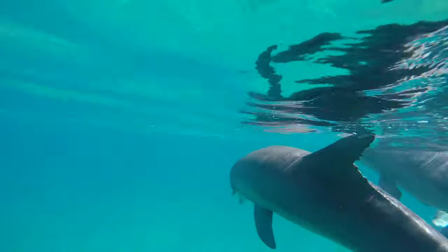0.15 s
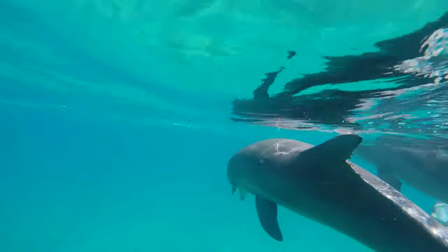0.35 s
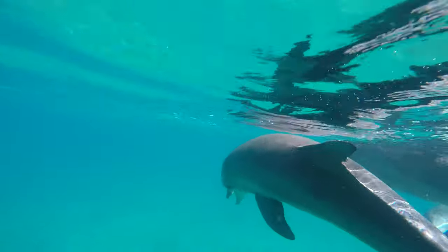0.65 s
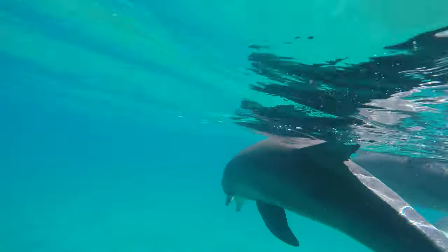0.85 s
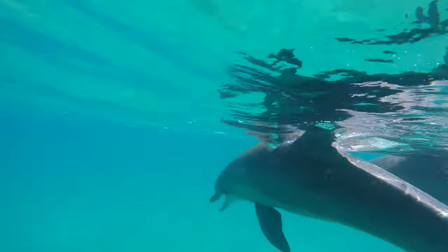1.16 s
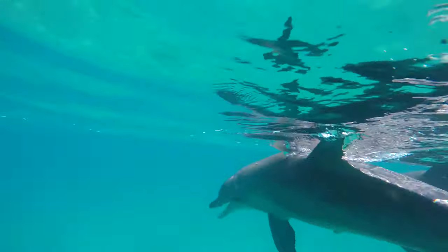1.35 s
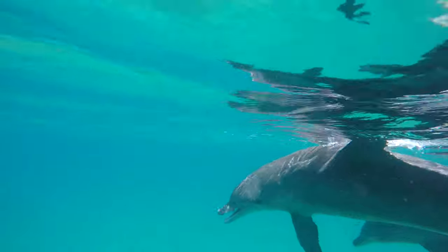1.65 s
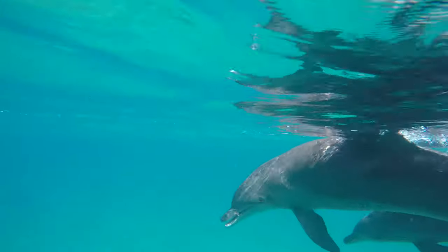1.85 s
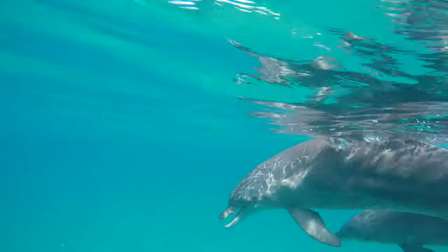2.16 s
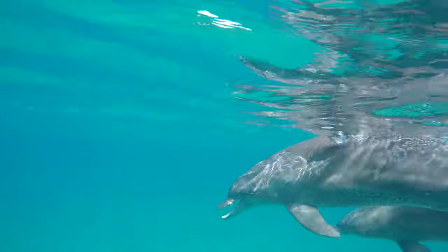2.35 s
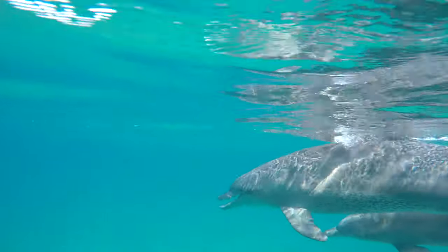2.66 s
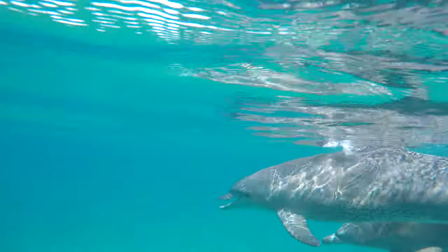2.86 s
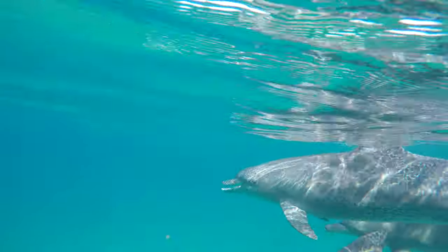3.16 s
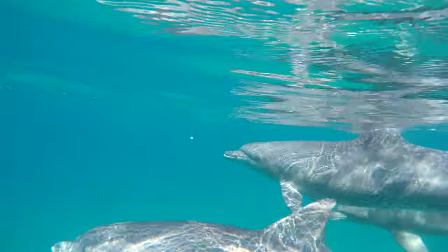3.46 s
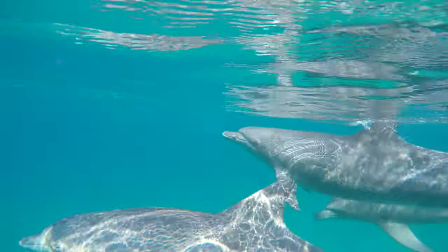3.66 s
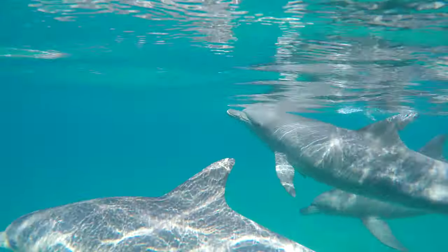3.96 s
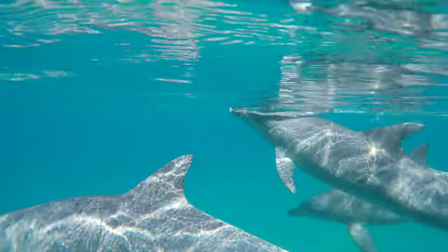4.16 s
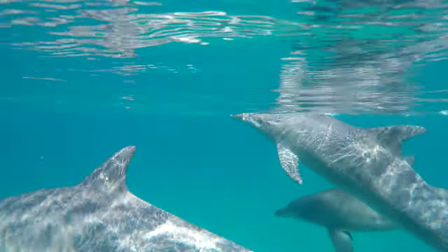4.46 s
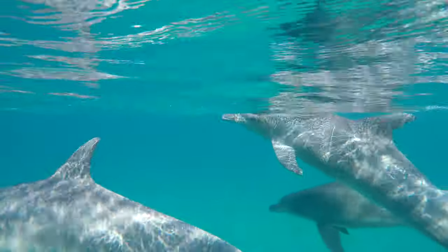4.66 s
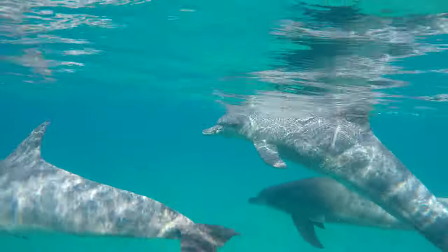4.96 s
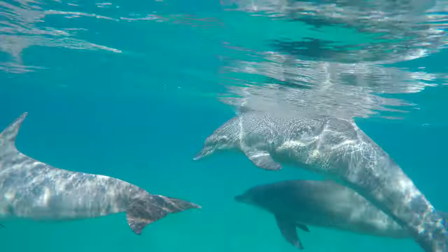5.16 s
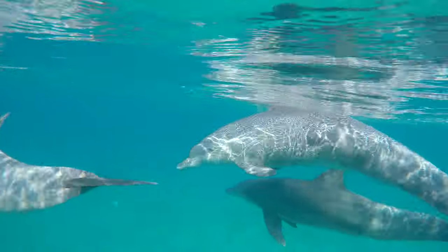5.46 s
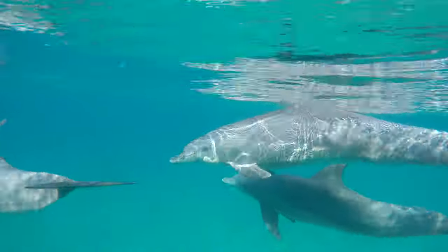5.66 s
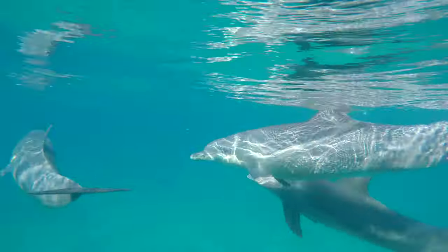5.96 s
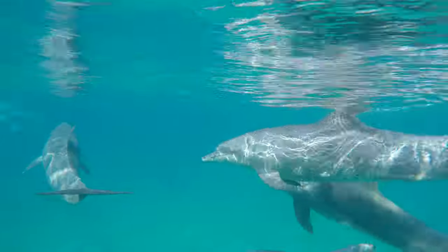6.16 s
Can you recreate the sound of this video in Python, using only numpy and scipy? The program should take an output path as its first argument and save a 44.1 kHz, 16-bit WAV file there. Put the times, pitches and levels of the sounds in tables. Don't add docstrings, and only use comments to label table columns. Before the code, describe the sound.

Underwater, dolphin sonar clicks buzz in rapid trains over low water rumble, with bubbly gulps, dull slaps, a knocking rattle and a tiny whistle.

```python
import sys
import numpy as np
from scipy import signal
from scipy.fft import rfft, irfft
from scipy.io import wavfile
from scipy.ndimage import uniform_filter1d

SR = 44100
rng = np.random.default_rng(int(sys.argv[2]) if len(sys.argv) > 2 else 0)


def file_out(sig):
    cols = np.atleast_2d(sig).T
    lim = np.clip(cols, -1, 1)
    pcm = np.round(lim * 32767).astype(np.int16)
    wavfile.write(sys.argv[1], SR, pcm)


def nominal_scale(level):
    x = np.asarray(level, float) / 20
    return 10 ** x


N = 278712


def rms_one(x):
    return x / np.sqrt(np.mean(x ** 2) + 1e-20)


def in_time(rows):
    s, *columns = np.transpose(rows)
    return [np.interp(np.arange(N) / SR, s, column) for column in columns]


def resonance(x, hz, width_hz):
    r = np.exp(-np.pi * width_hz / SR)
    zeros = np.array([1, 0, -1]) * (1 - r * r) / 2
    poles = [1, -2 * r * np.cos(2 * np.pi * hz / SR), r * r]
    return signal.lfilter(zeros, poles, x + 1e-18)


def body(x, modes):
    return sum((-1) ** k * nominal_scale(db) * resonance(x, hz, width) for k, (hz, width, db) in enumerate(modes))


def coloured(spectrum, lifts=()):
    hz = np.maximum(np.arange(N // 2 + 1) * SR / N, 1)
    corner_hz, corner_db = np.transpose(spectrum)
    db = np.interp(np.log(hz), np.log(corner_hz), corner_db)
    db += sum(lift / (1 + (2 * (hz - centre) / width) ** 2) for centre, width, lift in lifts)
    return rms_one(irfft(rfft(rng.standard_normal(N)) * nominal_scale(db), N))


def drift(rate_hz):
    r = np.exp(-2 * np.pi * rate_hz / SR)
    noise = rng.standard_normal(N + SR)
    return rms_one(signal.lfilter([1], [1, -2 * r, r * r], noise)[SR:])


def lumpy(rate_hz, lump_db):
    return rng.standard_normal(N) * nominal_scale(lump_db * drift(rate_hz))


def impulses(times, sizes):
    out = np.zeros(N)
    at = np.round(np.asarray(times) * SR).astype(int)
    np.add.at(out, np.clip(at, 0, N - 1), sizes)
    return out


def glide(rows):
    hz, db, *rest = in_time(rows)
    t = np.arange(N) / SR
    sounding = (t > rows[0][0]) * (t < rows[-1][0])
    return 2 * np.pi * np.cumsum(hz) / SR, np.sqrt(2) * nominal_scale(db) * sounding, rest


def flow_rumble():
    # (time [s], level [dB])
    flow_level = [(0.0, -32), (0.53, -28.5), (0.65, -25), (1.2, -30.5), (1.46, -27), (1.94, -34),
                  (1.97, -23.5), (2.04, -31.5), (2.2, -26), (2.32, -30.5), (3.71, -28), (4.03, -34),
                  (5.63, -31.5), (6.32, -30)]
    # (frequency [Hz], density [dB per Hz])
    rumble_spectrum = [(8.8, -30), (15, 2), (32, 2.5), (65, -4), (106, -13.5), (140, -34), (200, -36),
                       (260, -46.5), (440, -120)]
    return nominal_scale(in_time(flow_level)[0] + 1.46 * drift(2.6)) * coloured(rumble_spectrum)


def surge_db():
    # (start [s], rise [s], hold [s], release [s], cavity note level [dB])
    surges = [
        (0.09, 0.24, 0.37, .6, -54.5),
        (2.095, 0.029, 0.091, 0.2, -28),
        (2.2, 0.092, 0.543, 0.037, -47.5),
        (3.742, 0.088, 0.19, 0.39, -44.5),
        (5.729, 0.12, .6, .1, -44.5),
    ]
    t = np.arange(N) / SR
    calm_db, swing_db = -62, 20.5
    power = 0
    for start, rise, hold, release, db in surges:
        corners_s = np.cumsum([start, 0, rise, hold, release, .3])
        shape_db = np.interp(t, corners_s, [-60, -swing_db, 0, 0, -swing_db, -60])
        power = power + nominal_scale(db - calm_db + shape_db) ** 2
    return 10 * np.log10(1 + power)


def sea_hiss():
    # (frequency [Hz], density [dB per Hz])
    hiss_spectrum = [(530, 9), (900, 2.5), (1460, -5.5), (1640, -13), (2890, -1), (3820, -2), (7680, -9.5),
                     (13200, -12.5), (15300, -13), (16000, -35)]
    # (frequency [Hz], width [Hz], lift [dB])
    hiss_lifts = [(1627, 46, 14.5), (2340, 240, 9.5), (3240, 260, 4), (3830, 87, 6.5), (6660, 300, 2),
                  (9500, 130, 6)]
    level_db = -62.5 + 0.079 * surge_db() + 0.86 * drift(2.8)
    return nominal_scale(level_db) * coloured(hiss_spectrum, hiss_lifts)


def wash():
    # (frequency [Hz], width [Hz], level [dB])
    cavity_modes = [(625, 84, -27.5), (720, 110, -44)]
    # (time [s], frequency [Hz])
    cavity_pitch = [(0.0, 627), (2.1, 597), (2.2, 625), (2.27, 665), (2.4, 610.5), (2.85, 609), (3.8, 630),
                    (4.2, 625), (5.8, 625), (6.0, 625), (6.3, 611)]
    # (frequency [Hz], width [Hz], level [dB])
    second_mode = (991, 30, -23.5)
    # (frequency [Hz], width [Hz], level [dB])
    gurgle_modes = [(156, 48, 9.5), (337, 93, 5), (484, 450, -36)]
    # (frequency [Hz], width [Hz], level [dB])
    fizz_modes = [(1505, 260, -1), (1718, 120, 4), (1945, 140, -1.5)]
    lift_db = surge_db()
    note_db = -62 + lift_db
    gurgle_db = -70 + 0.95 * lift_db
    fizz_db = -70.5 + 0.32 * lift_db

    breath = body(lumpy(25.0, 2.9), cavity_modes)
    breathy = rms_one(resonance(resonance(breath, 453, 206), 632, 360))
    waver_hz = in_time(cavity_pitch)[0] + 22 * drift(30)
    sung = np.sqrt(2) * np.sin(2 * np.pi * np.cumsum(waver_hz) / SR) * nominal_scale(2.2 * drift(25))
    sung_share = np.clip(np.minimum((note_db + 57) / 10, (-21 - note_db) / 20), 0, .6)
    note = np.sqrt(sung_share) * sung + np.sqrt(1 - sung_share) * breathy
    hz, width, db = second_mode
    note += nominal_scale(db) * rms_one(resonance(resonance(lumpy(25.0, 0.58), hz, width), hz, 3 * width))

    gurgle = body(lumpy(19.5, 2.06), gurgle_modes)
    gurgle = rms_one(resonance(resonance(gurgle, 213, 520), 213, 520))
    fizz = rms_one(resonance(body(lumpy(38.0, 2.5), fizz_modes), 1770, 670))
    return nominal_scale(note_db) * note + nominal_scale(gurgle_db) * gurgle + nominal_scale(fizz_db - 3.0) * fizz


def bubbles():
    # (time [s], frequency [Hz], level [dB])
    large_bubble = [(5.63, 540, -75), (5.634, 545, -38), (5.645, 575, -40), (5.66, 660, -44),
                    (5.675, 700, -51), (5.692, 620, -44), (5.71, 580, -48), (5.73, 630, -54),
                    (5.75, 600, -65)]
    # (time [s], peak level [dB], frequency [Hz], 60 dB decay [s])
    small_bubbles = [(.024, -48.5, 3700, 0.027), (.096, -50.5, 3720, 0.031), (0.539, -53, 3920, .03),
                     (.4, -36.5, 519, 0.16), (.425, -39, 599, 0.069), (.448, -38.5, 730, 0.034),
                     (.72, -52, 2370, 0.044), (.775, -51, 1700, 0.029), (.922, -51.5, 1740, 0.046),
                     (1.022, -52, 1935, .05), (3.203, -48.5, 2400, 0.032), (1.172, -56, 1680, .03),
                     (4.345, -56.5, 2050, 0.094), (5.0, -57, 8200, 0.03), (2.097, -34.5, 584, 0.11),
                     (2.152, -16, 615, 0.056), (2.19, -18, 593, 0.051)]
    phase, size, _ = glide(large_bubble)
    out = size * np.sin(phase)
    t = np.arange(SR // 5) / SR
    for s, db, hz, t60 in small_bubbles:
        at = round(s * SR)
        envelope = nominal_scale(db - 60 * t / t60) * (1 - np.exp(-t / 0.0011))
        out[at:at + len(t)] += envelope * np.sin(2 * np.pi * hz * t * (1 + 0.22 * t))
    return out


def click_times(pace):
    s, per_s = np.transpose(pace)
    t = np.arange(s[0], s[-1], 1 / SR)
    done = np.cumsum(np.interp(t, s, per_s)) / SR
    whole = round(done[-1])
    return np.interp(np.arange(whole + 1) * done[-1] / whole, done, t)


def sonar():
    # (time [s], rate [clicks per s])
    paces = [
        [(0.0333, 18.3), (0.04, 35.5), (0.3, 51.5), (0.36, 50.2), (0.67, 55.8), (0.8, 57.1), (1.19, 60.2),
         (1.3, 54.5), (1.3793, 8.9)],
        [(1.6196, 73.3), (1.65, 68.2), (1.67, 82.8), (1.76, 56.9), (1.816, 16.2)],
        [(2.01, 85.3), (2.14, 67.8), (2.1763, 44.6)],
        [(2.2599, 6.8), (2.33, 64.4), (2.35, 79.5), (2.42, 85.4), (2.51, 59.2), (2.5547, 20.9)],
        [(2.7359, 24.7), (2.81, 56.7), (2.86, 60.7), (2.93, 54.9), (2.9822, 22.0)],
        [(3.235, 65.7), (3.36, 71.0), (3.41, 56.1), (3.4706, 18.9)],
        [(5.0763, 22.0), (5.09, 67.5), (5.3, 71.8), (5.67, 65.3), (5.84, 49.7), (5.97, 47.5), (6.13, 33.2),
         (6.23, 41.0), (6.2966, 53.2)],
    ]
    # (surface echo [dB], sand echo lag [ms], sand echo [dB])
    train_echoes = [
        (-3.5, 3.5, -1),
        (-12, 5.2, -11),
        (-1.5, 6, -8),
        (-8.5, 4.0, -0.5),
        (-11, 2, -1.5),
        (-8, 4.7, -3),
        (-6.5, 3.85, -10),
    ]
    # (time [s], bright snap [dB], hollow ring [dB])
    beam = [(0.034, -52, -58), (.39, -50, -57.5), (.83, -49, -61.5), (1.1, -43, -54), (1.38, -47, -49),
            (1.62, -43, -50.5), (1.76, -43, -46.5), (2.01, -43.5, -44.5), (2.26, -44.5, -45),
            (2.555, -48.5, -43.5), (2.736, -50.5, -49), (2.98, -45.5, -46), (3.235, -52, -49.5),
            (3.471, -55.5, -51), (5.077, -71, -53.5), (5.55, -57.5, -56), (5.95, -62, -51.5),
            (6.298, -67, -51.5)]
    # (time [s], facing the camera [0-1], distance [0-1], surface echo lag [ms], low thud [dB])
    pose = [(0.0, 0.6, 0.54, 0.59, -20), (.5, 0.65, 0.41, 0.59, -12), (.8, 0.68, 0.06, 0.65, -3),
            (1.38, 0.38, 0.04, 1.27, -21), (1.82, 0.35, 0.22, 1.54, -14), (2.26, 0.31, 0.01, 1.42, -22),
            (2.73, 0.1, 0.2, 1.44, -36), (2.99, 0, 0.85, 1.3, -20), (3.35, 0.05, 0.62, 1.425, -10)]
    pose = pose + [(5.07, .1, .95, 1.73, 0), (5.5, .1, .95, 1.73, -3), (5.75, .1, .95, 1.73, -14),
                   (6.3, .1, .95, 1.63, -18)]
    # (frequency [Hz], width [Hz], level [dB])
    thud_modes = [(730, 162, 6), (812, 205, 3)]
    # (frequency [Hz], width [Hz], head-on [dB], side-on [dB], far [dB])
    hollow_modes = [(1700, 170.6, -22, -4.5, -8.5), (1925, 120, -43, 6.5, -11), (2394, 97, -24, 10.5, -2.5),
                    (2663, 118, -11, 1.5, 1), (3205, 170, 3, 1, -4), (3887, 230, -2.5, 2.5, -10.5),
                    (4510, 910, -8, -5.5, -17)]
    # (frequency [Hz], width [Hz], head-on [dB], side-on [dB], far [dB])
    bright_modes = [(5140, 76, 1, -14, -7), (6536, 373, -9.5, 6, -5.5), (8120, 320, -7, -3.5, -5.5),
                    (9260, 360, -10.5, -0.5, 0), (10010, 480, 2.5, -4, -2.5), (11900, 220, -19, 1.5, -10),
                    (12600, 390, 13.5, -10, -6), (14460, 1970, 6.5, -8.5, -2.5), (14800, 530, -12, 5, -24)]

    trains = [click_times(pace) for pace in paces]
    s = np.concatenate(trains)
    echo_db, sand_ms, sand_db = np.repeat(train_echoes, [len(train) for train in trains], axis=0).T

    def at_clicks(rows):
        row_s, *columns = np.transpose(rows)
        return [np.interp(s, row_s, column) for column in columns]

    facing, far, lag_ms, thud_db = at_clicks(pose)
    bright_db, hollow_db = at_clicks(beam)
    out = body(impulses(s - .002, nominal_scale(hollow_db + thud_db + 39.0)), thud_modes)
    for modes, level_db in ((bright_modes, bright_db + 29), (hollow_modes, hollow_db + 34.5)):
        for k, (hz, width, head_db, side_db, far_db) in enumerate(modes):
            sweep_s = far ** 8 * .003 * np.log2(min(hz, 3400) / 2700)
            at = s - .0009 * far ** 2 + sweep_s
            near_db = facing * head_db + (1 - facing) * side_db
            scatter_db = level_db + rng.normal(0, 1.0, len(s))
            size = nominal_scale(scatter_db + (1.5 - far) * near_db + far * far_db)
            echo_loss_db = -6.0 * np.log2(max(hz, 2200) / 2400)
            clicks = impulses(at, size)
            clicks -= impulses(at + lag_ms / 1000, size * nominal_scale(echo_db + echo_loss_db))
            if hz < 5000:
                sand_loss_db = 6.4 * abs(np.log2(hz / 2600))
                sand_size = nominal_scale(scatter_db + far_db + sand_db - sand_loss_db)
                clicks += impulses(at + sand_ms / 1000, sand_size)
            out += (-1) ** k * resonance(clicks, hz, width)
    return out


def thumps():
    # (time [s], peak level [dB], width [s])
    slaps = [(0.148, -21.5, 0.0031), (0.802, -21, 0.003), (1.172, -31.5, 0.0018), (1.514, -39, 0.002),
             (1.817, -24.5, 0.0029), (1.963, -26, 0.0065), (1.968, -21.5, 0.00148), (1.978, -25.5, 0.0011),
             (2.183, -16.5, 0.0051), (5.511, -40.5, 0.0008), (3.581, -21.5, 0.0034), (5.607, -18.5, 0.0044),
             (6.315, -17, 0.003)]
    t = np.arange(N) / SR
    out = np.zeros(N)
    for s, db, width in slaps:
        u = (t - s) / width
        out += nominal_scale(db) * (1 - u ** 2) * np.exp(-u ** 2 / 2)
    return out


def sprays():
    # (time [s], spread [s], level [dB], centre [Hz], width [Hz])
    clouds = [
        (2.196, 0.012, -56, 2800, 5600),
        (2.19, 0.042, -55, 2000, 2600),
        (4.44, 0.063, -64.5, 990, 1700),
        (0.64, 0.086, -60, 620, 240),
    ]
    t = np.arange(N) / SR
    out = np.zeros(N)
    for s, spread, db, hz, width in clouds:
        swell = nominal_scale(db + 3.4 * drift(53.0)) * np.exp(-((t - s) / spread) ** 2 / 2)
        out += swell * rms_one(resonance(resonance(rng.standard_normal(N), hz, width), hz, width))
    return out


def rattle(pulses, tail_s):
    onset = signal.lfilter([.03], [1, -.97], pulses)
    envelope = signal.lfilter([1], [1, -np.exp(-1 / (tail_s * SR))], onset)
    return envelope * rng.standard_normal(N)


def knocks():
    # (time [s], peak level [dB], bright part [dB])
    jaw_knocks = [
        (3.902, -44, -13),
        (3.9376, -41.5, -11),
        (3.975, -34.5, -19.5),
        (4.0154, -25, -19),
        (4.0684, -28, -23),
        (4.104, -42.5, -28),
        (4.134, -44.5, -25),
        (5.076, -50, -24),
    ]
    # (frequency [Hz], width [Hz], level [dB])
    knock_modes = [(867, 130, -4), (1700, 69, 2.5), (2400, 75, -1.5), (2670, 67, -3), (3190, 144, -2.5),
                   (4050, 152, -6.5), (4840, 840, -11.5), (6600, 620, -12), (9100, 1200, -17),
                   (13300, 2700, -23.5)]
    s, db, bright_db = np.transpose(jaw_knocks)
    low_modes = [mode for mode in knock_modes if mode[0] < 4500]
    high_modes = [mode for mode in knock_modes if mode[0] >= 4500]
    low = body(rattle(impulses(s, nominal_scale(db + 12.0)), 0.0072), low_modes)
    high = body(rattle(impulses(s, nominal_scale(db + bright_db + 24.5)), 0.0061), high_modes)
    return low + high


def whistle():
    # (time [s], frequency [Hz], level [dB], overtone [dB])
    contour = [(5.165, 4630, -80, -20), (5.172, 4530, -70, -12), (5.19, 4570, -53.5, -24),
               (5.21, 4800, -68, -8), (5.235, 4820, -60, -10), (5.25, 5270, -77, -7),
               (5.256, 5250, -85, -4)]
    phase, size, (overtone_db,) = glide(contour)
    return size * (np.sin(phase) + nominal_scale(overtone_db) * np.sin(2 * phase))


def scene():
    water = flow_rumble() + sea_hiss() + wash() + bubbles() + thumps() + sprays()
    dolphins = sonar() + knocks() + whistle()
    return (water + dolphins)[None]


def band_limit(x):
    return signal.sosfilt(signal.butter(12, 16490, fs=SR, output="sos"), x)


def record(dry):
    # (low [Hz], high [Hz], needed level over the band's quiet level [dB])
    top_bands = [(12800, 13300, -2.5), (13300, 13800, -2), (13800, 14300, -1.5), (14300, 14800, -1),
                 (14800, 15300, 0), (15300, 15900, 8), (15900, 17000, 22)]
    rolled = signal.sosfilt(signal.butter(14, 15900, fs=SR, output="sos"), dry)
    hz = np.arange(N // 2 + 1) * SR / N
    spare_db = 2 * drift(6)
    for low, high, need_db in top_bands:
        band = irfft(rfft(rolled) * (hz >= low) * (hz < high), N)
        level_db = 10 * np.log10(uniform_filter1d(band ** 2, size=1024) + 1e-14)
        threshold_db = np.percentile(level_db, 30) + need_db
        faint = level_db + spare_db + 1.5 * drift(15) < threshold_db
        rolled = rolled - .85 * uniform_filter1d(faint * 1., size=256) * band
    return band_limit(rolled)


dry = scene()
out = record(dry)
file_out(out)
```